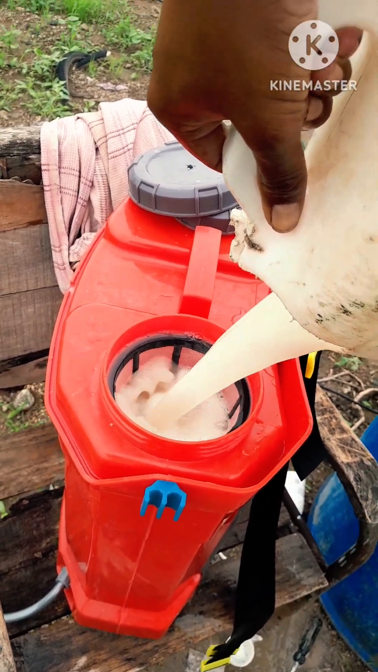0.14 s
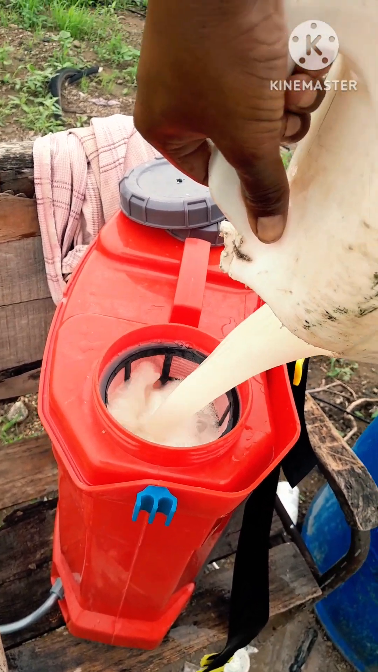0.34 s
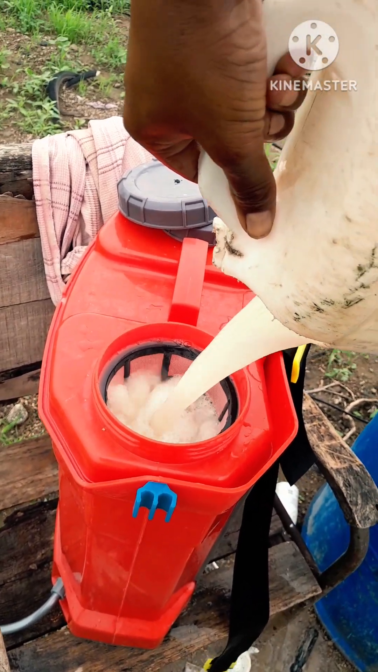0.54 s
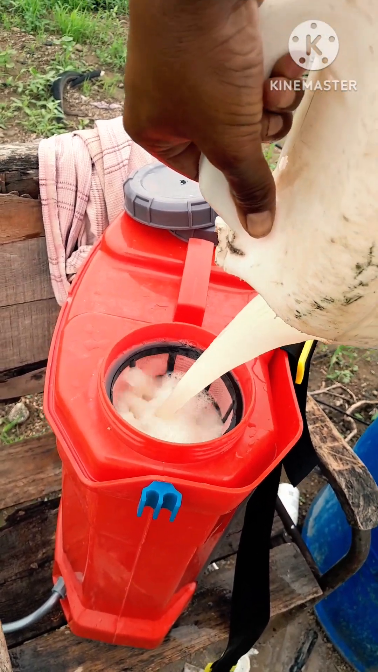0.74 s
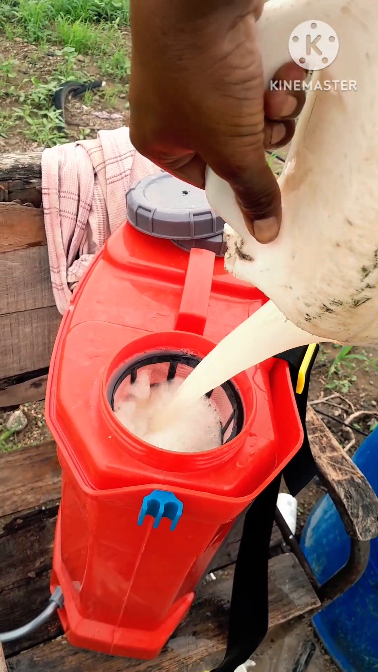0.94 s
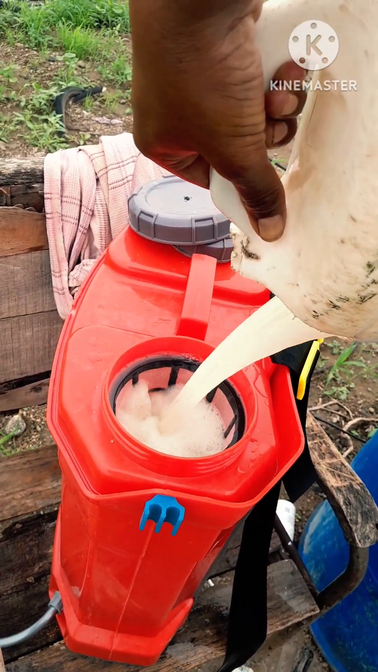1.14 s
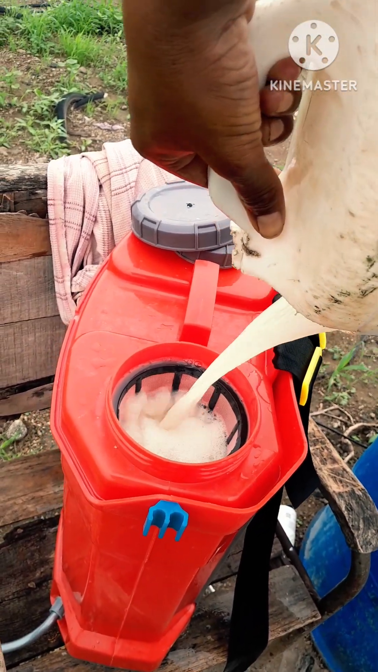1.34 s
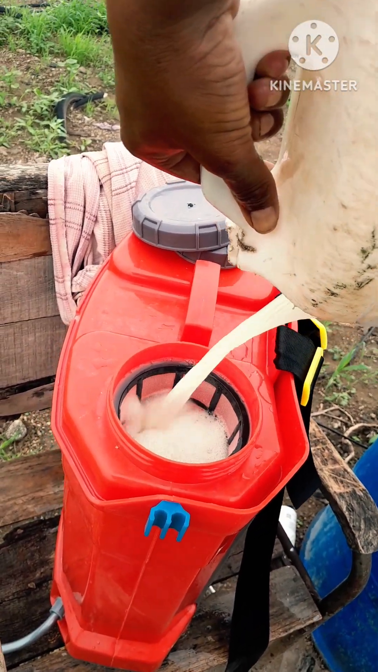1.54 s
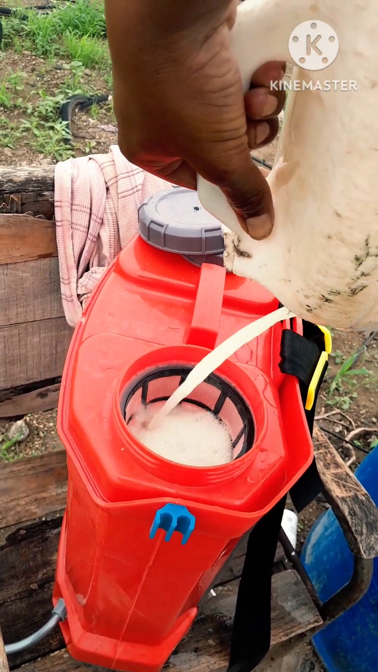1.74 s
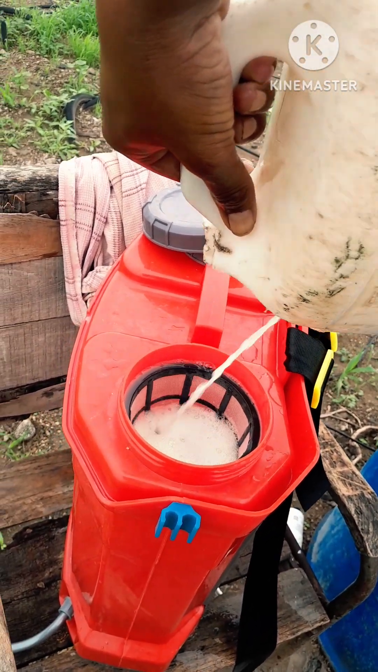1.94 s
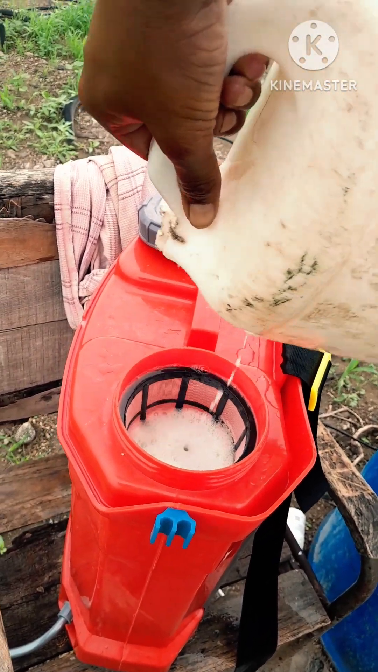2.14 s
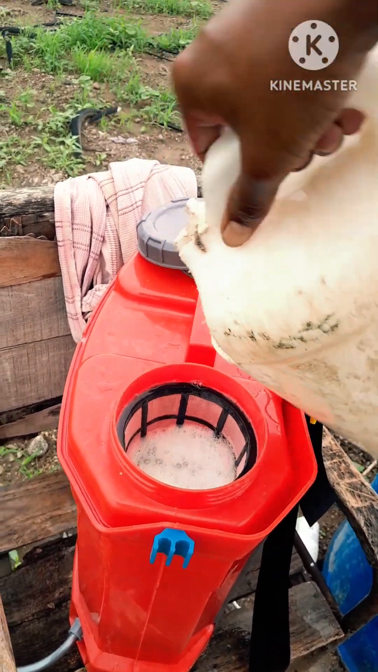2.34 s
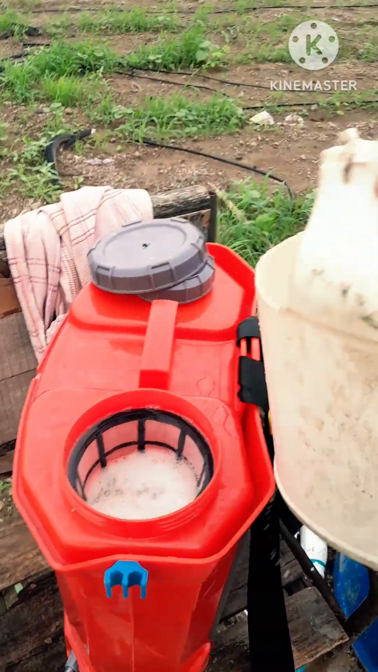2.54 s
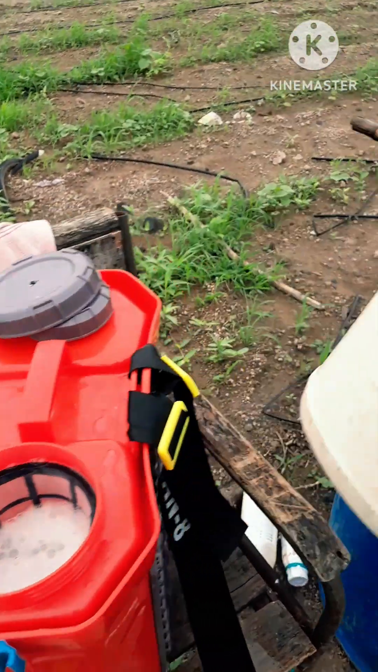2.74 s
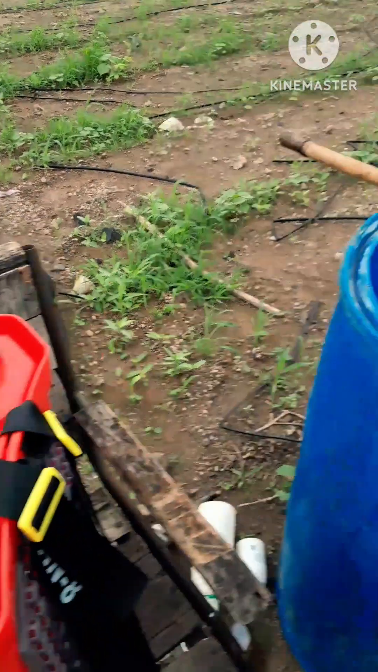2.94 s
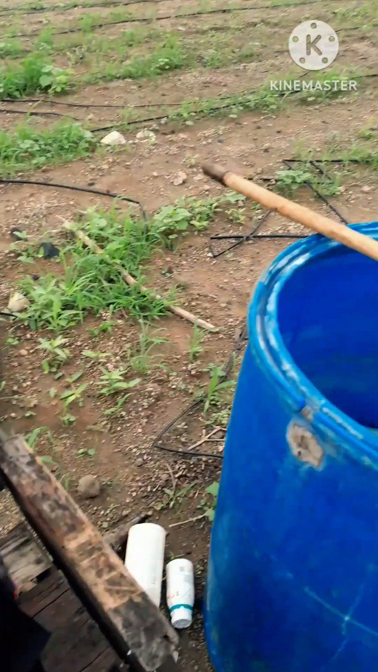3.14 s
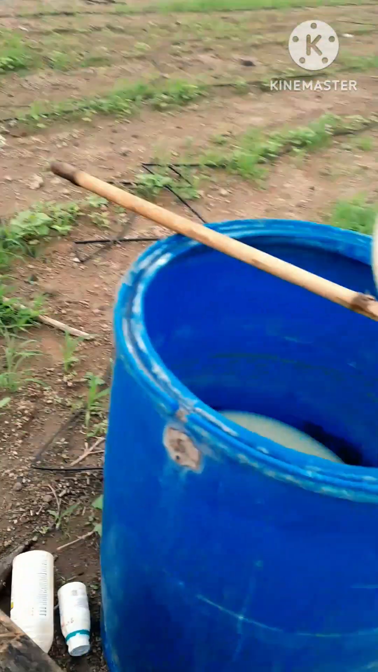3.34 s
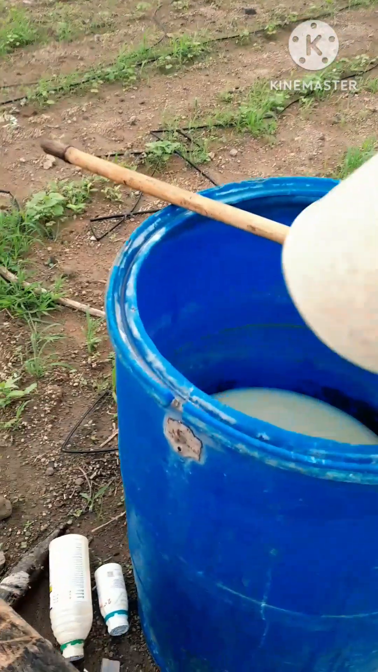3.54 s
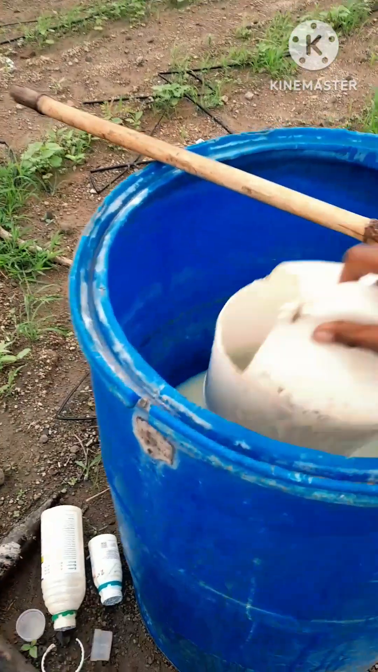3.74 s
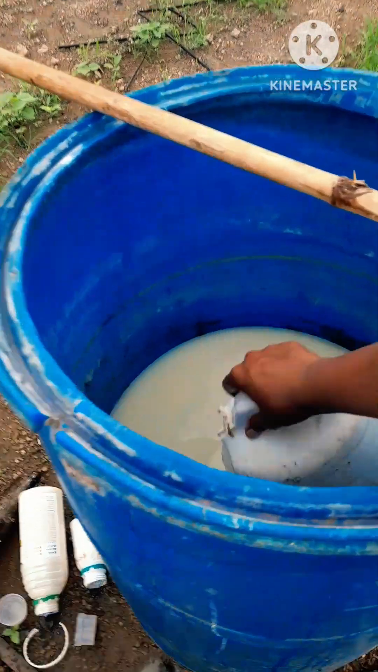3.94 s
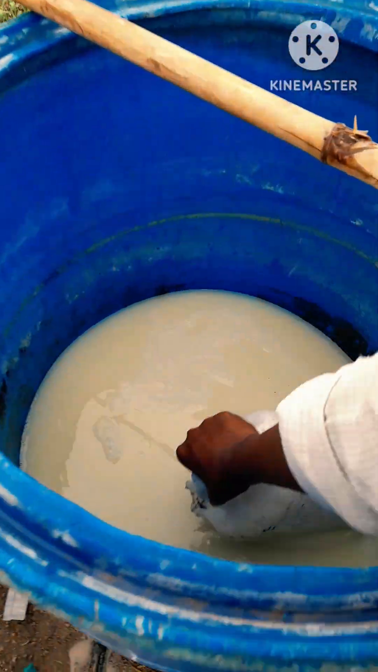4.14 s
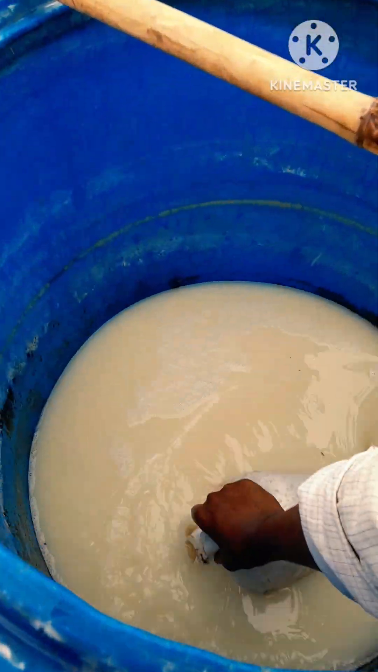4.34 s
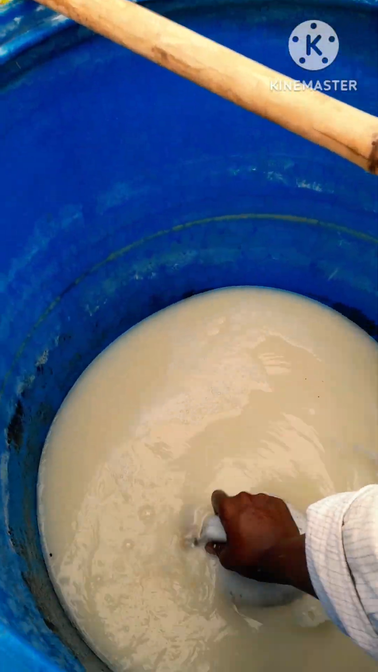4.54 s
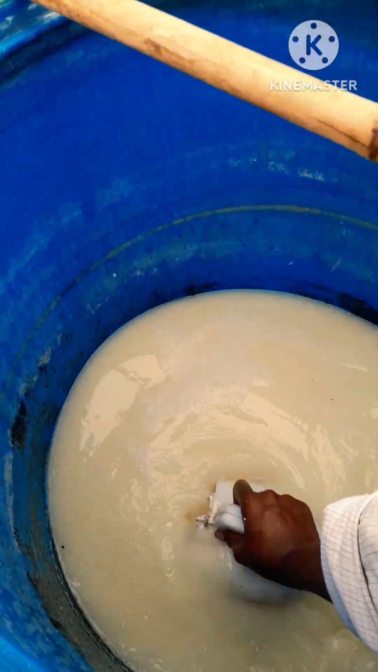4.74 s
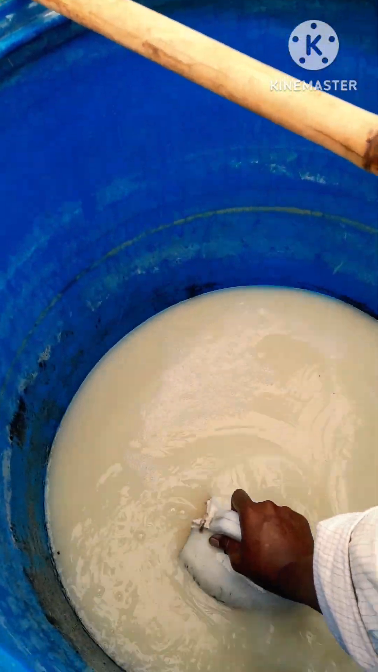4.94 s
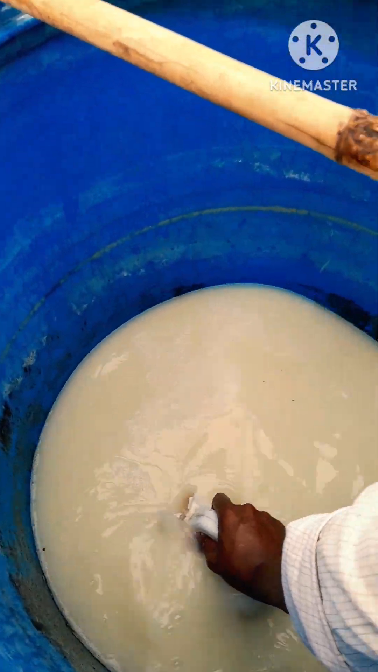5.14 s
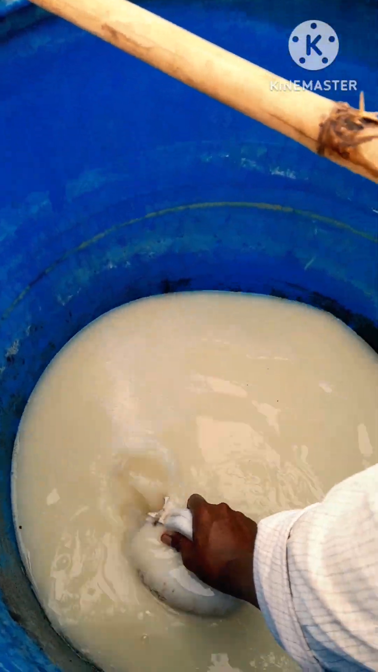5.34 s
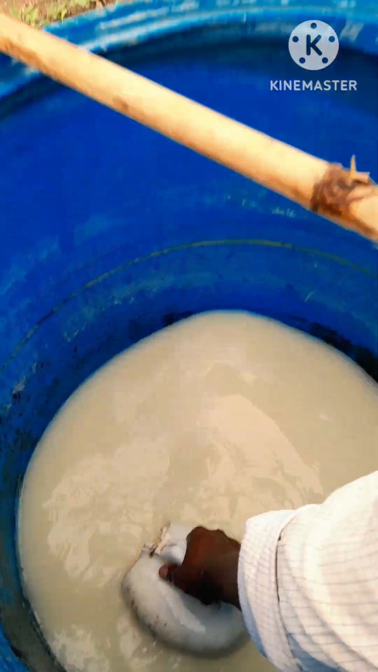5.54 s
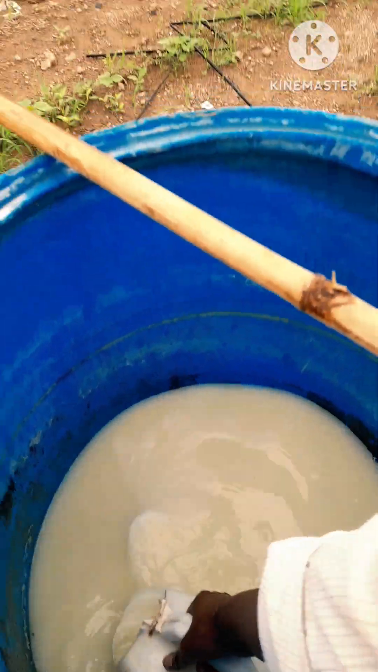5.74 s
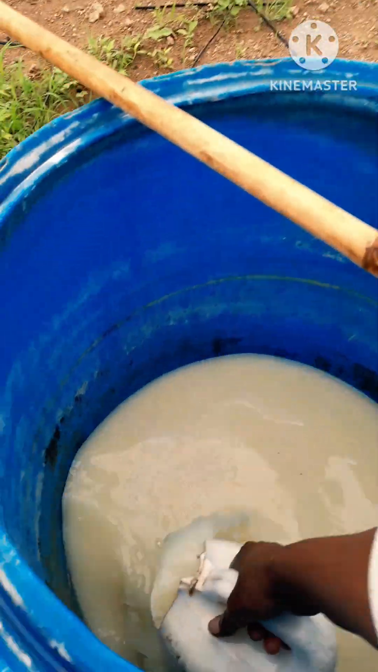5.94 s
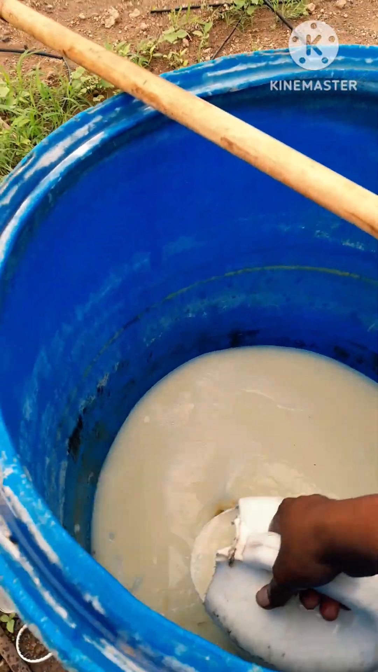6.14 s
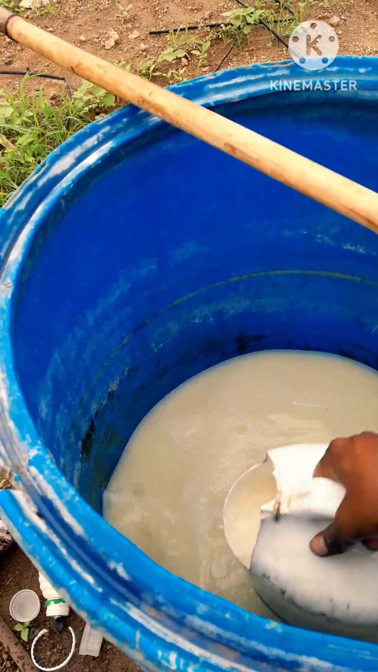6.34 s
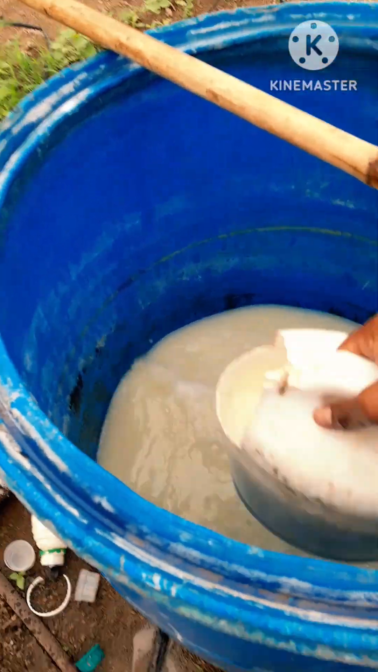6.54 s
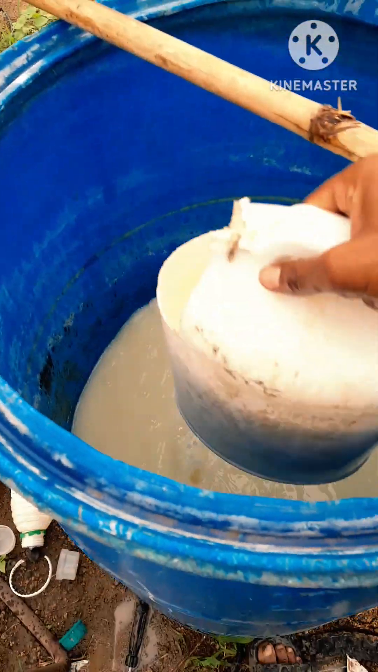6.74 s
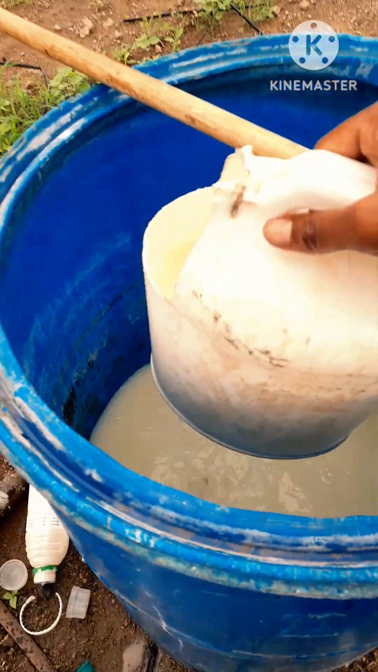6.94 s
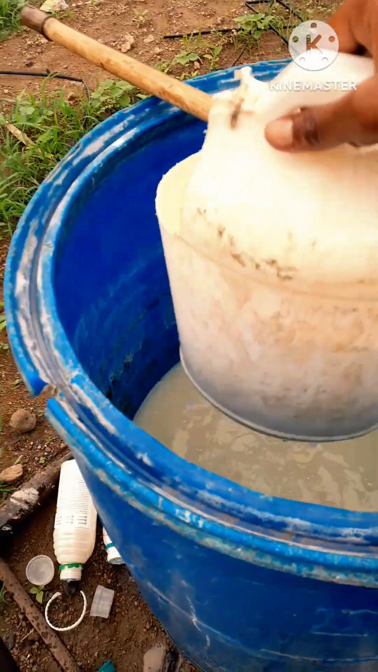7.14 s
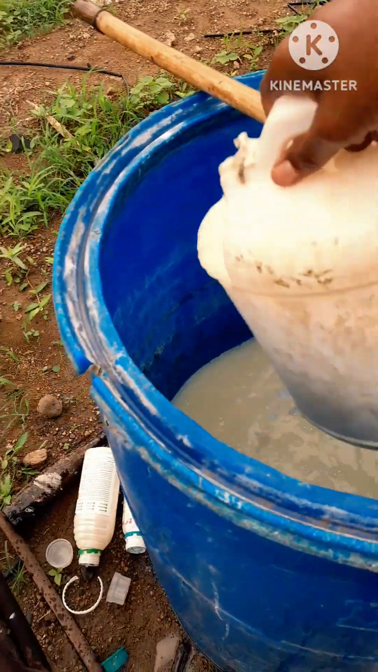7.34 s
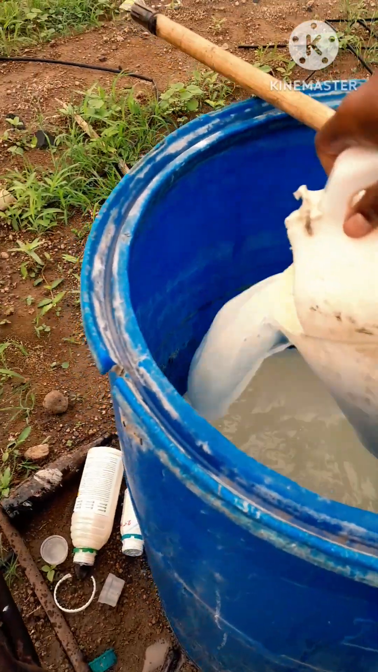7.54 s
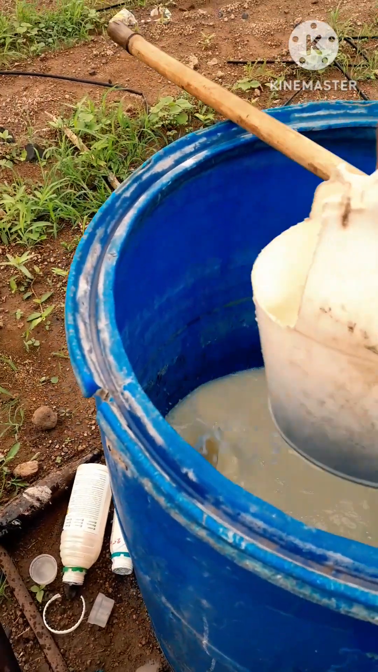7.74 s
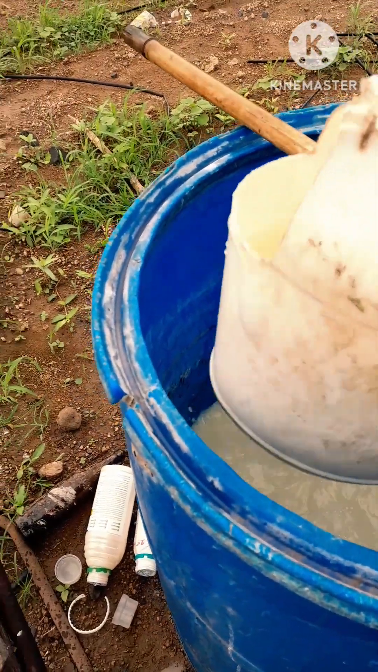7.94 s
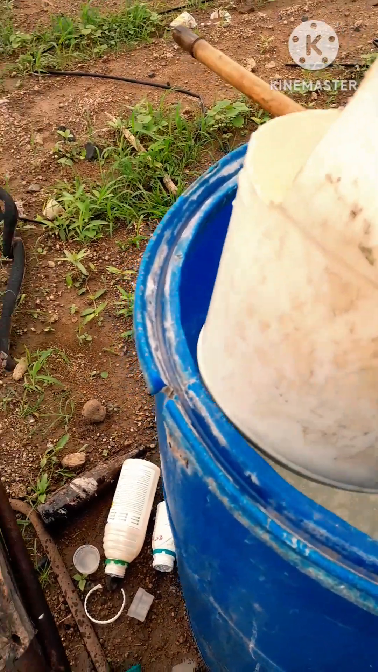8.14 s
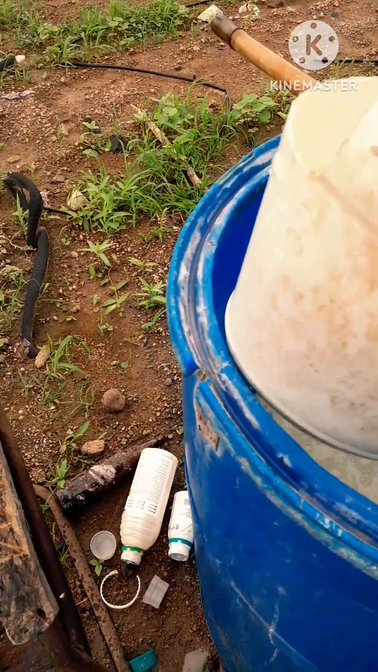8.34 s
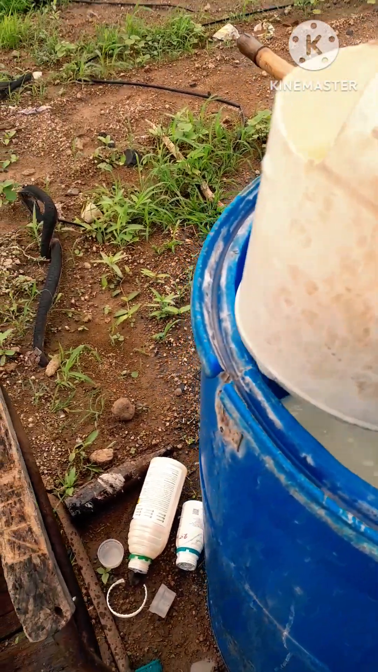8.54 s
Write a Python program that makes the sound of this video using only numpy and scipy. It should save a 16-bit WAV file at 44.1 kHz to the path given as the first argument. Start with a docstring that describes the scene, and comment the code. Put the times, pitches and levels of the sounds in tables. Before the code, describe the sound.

Liquid trickles through a strainer into a hollow tank and thins to drips, then a bucket plunges, gulps, and spills in a ringing barrel.

```python
"""A plastic bucket is dunked in a barrel: it gulps, fills, is lifted dripping, and spills a gush back.
Clouds of bubble tones make the churn, splash and spray, and the barrel's air rings with them.
Before that, liquid runs through a strainer into a sprayer tank and thins to drips: bubble tones again.
Wind is low shaped noise with short swings; shaped noise also makes the outdoor hush and the bucket's swish."""
import sys
import numpy as np
from scipy import signal
from scipy.fft import rfft, irfft, next_fast_len
from scipy.io import wavfile
from scipy.ndimage import uniform_filter1d, map_coordinates

SR = 44100
rng = np.random.default_rng(int(sys.argv[2]) if len(sys.argv) > 2 else 0)


def log_audio(samples):
    """Write samples as a 16-bit WAV file to the path given in sys.argv[1]."""
    # one column per channel
    frames = np.atleast_2d(samples).T
    # limit to full scale, then quantise
    limited = np.clip(frames, -1, 1)
    pcm = np.round(limited * 32767).astype(np.int16)
    wavfile.write(sys.argv[1], SR, pcm)


N = 378819

# Levels in the tables are relative: mixing, ringing and random swings come on top.
# how alike liquid noise is at left and right: [f/Hz, likeness 0-1]
WATER_ALIKE = [(200, 0.77), (600, 0.75), (1200, 0.02), (2500, 0.11), (10000, 0)]
# tone colour of small cracks and spatter: [f/Hz, level/dB]
CRACK_COLOUR = [(300, 1.5), (900, 3.5), (2800, 8), (6500, -2), (9500, -12), (15500, -14)]


def amp(db):
    """Turn decibels into a gain."""
    return 10 ** (np.asarray(db) / 20)


def unit(x):
    """Scale to an average strength (rms) of 1."""
    return x / np.sqrt(np.mean(x ** 2) + 1e-20)


def along(points, hz):
    """Read values between (f/Hz, value) points, with frequency on a log axis."""
    f, v = np.transpose(points)
    return np.interp(np.log(hz + 1), np.log(f + 1), v)


def curves(rows):
    """Give one value per sample for each column after the time."""
    s, *columns = np.transpose(rows)
    return [np.interp(np.arange(N) / SR, s, column) for column in columns]


def between(start_s, end_s):
    """Give 1 from start to end and 0 elsewhere, with soft edges."""
    t = np.arange(N) / SR
    inside = 1.0 * ((t >= start_s) & (t <= end_s))
    return uniform_filter1d(inside, size=900)


def wobble(rate):
    """Draw a smooth random curve through `rate` random points a second."""
    points = rng.standard_normal(int(N * rate / SR) + 4)
    return map_coordinates(points, [np.arange(N) * rate / SR])


def filtered(x, response):
    """Change the strength of each frequency in x by a given response."""
    m = next_fast_len(N + SR // 2)
    hz = np.fft.rfftfreq(m, 1 / SR)
    return irfft(rfft(x, m) * response(hz), m)[..., :N]


def coloured(x, spectrum):
    """Give x a tone colour without sounding ahead of time, at rms 1."""
    def response(hz):
        # folding the cepstrum onto positive times makes the filter causal
        cepstrum = irfft(np.log(amp(along(spectrum, hz))))
        half = len(cepstrum) // 2
        folded = 2 * cepstrum[:half] * (np.arange(half) > 0)
        return np.exp(rfft(folded, len(cepstrum)))
    return unit(filtered(x, response))


def noise_pair(alike):
    """Make white noise at two microphones by mixing a shared and an opposed part."""
    def shares(hz):
        turn = np.arccos(np.clip(along(alike, hz), -1, 1)) / 2
        return np.array([np.cos(turn), np.sin(turn)])
    mid, side = filtered(rng.standard_normal((2, N)), shares)
    return np.array([mid + side, mid - side])


def narrow_noise(hz, width_hz, steady):
    """Make a fuzzy tone that follows a pitch curve, rms 1; random drift blurs the pitch."""
    drift = steady + wobble(width_hz) + 1j * wobble(width_hz)
    carrier = np.exp(2j * np.pi * np.cumsum(hz) / SR)
    return unit(np.real(drift * carrier))


def add(track, s, sound):
    """Mix a sound into a track at time s."""
    start = max(round(s * SR), 0)
    part = track[start:start + len(sound)]
    part += sound[:len(part)]


def from_left(x):
    """The sound reaches the left microphone first, less so as the barrel comes to the front."""
    # how much sooner the left hears it: [t/s, lead/s]
    lead_table = [(4.5, 0.00024), (6.2, .00023), (6.9, 0.00016), (8, 0.000087)]
    lead_s, = curves(lead_table)
    return np.array([map_coordinates(x, [np.arange(N) + side * lead_s * SR / 2]) for side in (1, -1)])


def bubbles(rate, low_hz, high_hz, cycles, spread_db, rise, wash):
    """Many bubbles, `rate` a second, each ring with a rising, dying tone; smooth noise (`wash`) joins them."""
    when, size, pitch, phase, bearing = rng.random((int(rate * N / SR), 5)).T
    hz = (low_hz * (high_hz / low_hz) ** pitch)[:, None]
    length = min(int(cycles / low_hz * SR), 5000000 // len(hz))  # the second limit saves memory
    t = np.arange(length) / SR
    age = t * hz / cycles  # reaches 1 after the given number of cycles
    size_db = spread_db * np.minimum(-np.log(1 - size), 4)
    strength = amp(size_db)[:, None] * (hz / low_hz) ** 0.91
    polarity = np.sign(phase - .5)[:, None]
    swing = np.sin(2 * np.pi * hz * t * (1 + rise * np.minimum(age, 1) / 2))
    tones = strength * polarity * amp(-45 * age) * swing
    # each bubble sits at its own bearing and reaches one microphone first
    lag = (bearing - .5) * .0003 * SR
    cloud = []
    for side in (-1, 1):
        start = np.abs(when * N + side * lag).astype(int)
        places = start[:, None] + np.arange(len(t))
        cloud.append(np.bincount(places.ravel(), tones.ravel(), N)[:N])
    return unit(unit(np.array(cloud)) + wash * noise_pair(WATER_ALIKE))


def turbulent(x, depth_db):
    """Bubble clouds form and break up: narrow bands swell and sink at random."""
    z = signal.stft(x, nperseg=1024)[2]
    patch_shape = np.outer(np.hanning(6), np.hanning(8))
    patches = signal.fftconvolve(rng.standard_normal(z.shape[1:]), patch_shape, mode="same")
    return unit(signal.istft(z * amp(depth_db * unit(patches)), nperseg=1024)[1][:, :N])


def ring(hz, t60, attack, rise):
    """One bubble rings with a soft start, a sliding pitch and a decay; its envelope peaks at 1."""
    t = np.arange(SR // 3) / SR
    shape = amp(-60 * t / t60) * (1 - np.exp(-(t / attack) ** 2))
    return shape / shape.max() * np.sin(2 * np.pi * hz * t * (1 + rise * np.minimum(t / t60, 1)))


def glide(length, start_hz, end_hz):
    """A tone swells and fades while its pitch slides."""
    u = np.linspace(0, 1, max(int(length * SR), 2))
    hz = start_hz * (end_hz / start_hz) ** u
    return np.sin(np.pi * np.sqrt(u)) * np.sin(2 * np.pi * np.cumsum(hz) / SR)


def echo(x, decay):
    """A vessel answers with a blurred echo; each frequency dies at its own speed."""
    hz, t, z = signal.stft(noise_pair(WATER_ALIKE)[:, :SR // 2], SR, nperseg=256)
    t60 = along(decay, hz)[:, None]
    fading = z * amp(-60 * t / t60) * np.sqrt(2 * np.log(1000) / (t60 * SR))
    tail = signal.istft(fading, SR, nperseg=256)[1]
    return signal.fftconvolve(x.mean(0)[None], tail, axes=1)[:, :N]


def standing_waves(x, modes):
    """The air between a vessel's walls rings on in narrow tones."""
    t = np.arange(SR // 2) / SR
    answer = np.zeros(len(t))
    for hz, db, t60 in modes:
        even_out = np.log(1000) / (t60 * SR)  # long rings are not favoured over short ones
        answer += amp(db - 60 * t / t60) * np.cos(2 * np.pi * hz * t) * even_out
    return signal.fftconvolve(x, 2 * answer)[:N]


def field():
    """Noise makes the field's hush and the lowered bucket's swish and brushes; a faint tone whistles down."""
    # the open-air hush: [t/s, level/dB]
    hush_table = [(2.2, -64), (3.1, -69), (5.7, -62), (5.9, -68.5), (6.1, -64)]
    # colour of the hush: [f/Hz, level/dB]
    air_colour = [(30, -4.5), (120, 1), (500, -9.5), (900, -11.5), (1500, -8), (4000, -11), (8200, -16.5),
                  (9000, -24.5), (15500, -22.5)]
    # soft swish as the bucket is lowered into the barrel: [t/s, level/dB, centre f/Hz]
    swish_table = [(3.6, -87, 2700), (3.8, -64.5, 2600), (3.95, -63, 2400), (4.05, -60, 2070),
                   (4.26, -61, 2700), (4.38, -63.5, 1794), (5.75, -63, 1800), (5.87, -85, 1790)]
    # colour of the swish: [f/Hz, level/dB]
    swish_colour = [(150, -3), (500, 7), (1100, -2.5), (2300, -1.5), (3500, -4), (7500, -8), (9500, -15),
                    (15500, -15)]
    # sleeve and bucket brush past the rim: [t/s, length/s, level/dB, centre f/Hz]
    brushes = [(3.725, 0.049, -57, 2250), (4.225, .03, -55.5, 1500), (4.309, 0.043, -59, 3500)]
    swish_db, swish_hz = curves(swish_table)
    hush_db, = curves(hush_table)
    whistle = np.zeros(N)
    add(whistle, 3.49, amp(-71.0) * glide(length=0.2, start_hz=6250, end_hz=2730))
    band = np.array([narrow_noise(swish_hz, width_hz=700, steady=0) for channel in range(2)])
    swish_noise = unit(coloured(noise_pair(WATER_ALIKE), swish_colour) + 0.5 * band)
    swish = amp(swish_db + 4.5 + 1.4 * wobble(16)) * swish_noise
    for channel in swish:
        roughness = wobble(1600)  # blurs each brush tone into a noise band
        for s, length, db, hz in brushes:
            stroke = glide(length, hz, hz)
            add(channel, s, amp(db + 3.5) * stroke * roughness[round(s * SR):][:len(stroke)])
    hush = amp(hush_db) * coloured(noise_pair(WATER_ALIKE), air_colour)
    return hush + from_left(whistle * wobble(150)) + swish


def wind():
    """Lumpy eddies and a few hard buffets press on each microphone port differently."""
    # wind strength that drives the eddies: [t/s, level/dB]
    wind_table = [(0, -42), (.35, -40), (.7, -48.5), (1.15, -57), (1.6, -47.5), (2.1, -50.5), (2.2, -55),
                  (2.95, -67), (3.5, -50.5), (3.95, -70), (4.3, -91), (4.5, -63), (5.5, -58), (5.7, -54),
                  (5.9, -71), (6.35, -49.5), (6.65, -55), (7.15, -42), (8.15, -44), (8.55, -40)]
    # which port the wind favours: [t/s, left minus right level/dB]
    side_table = [(0, -7), (3.5, -3.5), (6, -3), (6.8, 3.5), (7.3, 6), (7.6, 5), (8.5, 2)]
    # how alike the wind is at left and right: [f/Hz, likeness 0-1]
    wind_alike = [(25, 0.13), (200, 0.056)]
    # colour of the large eddies: [f/Hz, level/dB]
    rumble_colour = [(20, -25.5), (50, 1), (100, 1), (150, -9), (240, -22), (450, -40.5), (1000, -66)]
    # colour of the smaller, higher eddies: [f/Hz, level/dB]
    flutter_colour = [(90, -21), (170, -0.5), (260, -6.5), (450, -15), (1000, -68.5)]
    # single buffets, each port varying around them: [t at the peak/s, level/dB, pitch f/Hz]
    buffets = [(0.105, -18.5, 80), (0.299, -22, 68), (0.646, -30.5, 72), (1.545, -23, 100),
               (2.053, -24, 78), (2.322, -32.5, 88), (3.332, -36, 85), (3.419, -35.5, 83),
               (6.326, -31.5, 94), (6.802, -28.5, 70), (7.101, -14.5, 115), (7.166, -24.5, 107),
               (7.334, -22.5, 88.4), (7.607, -21, 102), (7.829, -15.5, 118), (8.003, -21.5, 106),
               (8.217, -26, 94), (8.411, -17, 120), (8.5, -21, 157), (8.546, -19, 92)]
    level_db, = curves(wind_table)
    side_db, = curves(side_table)
    eddy_swing_db = 4.5 * wobble(14)
    port_swing_db = 4 * np.array([wobble(28), wobble(28)])
    lumps = amp(eddy_swing_db + port_swing_db)
    air = amp(level_db + 7.5) * unit(lumps * coloured(noise_pair(wind_alike), rumble_colour))
    # stronger gusts shed smaller, higher eddies
    flutter = unit(lumps * coloured(noise_pair(wind_alike), flutter_colour))
    air = air + amp(1.498 * level_db + 17) * flutter
    t = np.arange(-SR // 20, SR // 20) / SR
    for s, db, hz in buffets:
        for port in air:
            late, detune = rng.standard_normal(2)
            cycles = (t - 0.0012 * late) * hz * np.exp(0.15 * detune)
            hump = 1 / (1 + (cycles / 0.65) ** 2) ** 1.4  # only about one swing stands out
            add(port, s + t[0], amp(db + 0.5) * np.sin(2 * np.pi * cycles) * hump)
    return air * amp(np.array([[.5], [-.5]]) * side_db)


def ticks():
    """Each loud drop or light tap of plastic is a short noise crack and a tiny ring."""
    # drops and taps: [t/s, level/dB, starting pitch f/Hz]
    tick_table = [(.198, -41.5, 1510), (.344, -39, 2360), (0.661, -40.5, 1450), (1.248, -44, 1850),
                  (1.336, -39, 3130), (1.493, -37.5, 3570), (1.545, -42, 3100), (1.672, -42.5, 2000),
                  (1.981, -43.5, 1870), (2.092, -34.5, 1300), (2.157, -40, 2570), (2.21, -43, 1460),
                  (2.593, -38, 1490), (3.216, -42.5, 1130), (3.258, -41.5, 2820), (4.446, -21, 1450),
                  (5.45, -35, 2570), (5.568, -30, 2960), (5.645, -36.5, 4380), (6.035, -31, 825),
                  (6.095, -22, 1790), (6.104, -21.5, 3140), (6.171, -26.5, 6700), (6.266, -25.5, 2130),
                  (6.336, -27, 3100), (6.37, -30, 1550), (6.423, -33, 2930), (6.537, -39, 1880),
                  (6.626, -40.5, 2650), (6.664, -42.5, 4900), (6.721, -46, 4100), (6.796, -35, 2760),
                  (7.109, -35, 3000), (7.19, -37.5, 3070), (7.465, -28.5, 1270), (7.724, -27.5, 3100),
                  (8.136, -28, 2760), (8.241, -37.5, 6400), (8.31, -38, 2350)]
    out, t = np.zeros((2, N)), np.arange(SR // 3) / SR
    for channel, noise in zip(out, coloured(noise_pair(WATER_ALIKE), CRACK_COLOUR)):
        for s, db, hz in tick_table:
            crack = np.roll(noise, -round(s * SR))[:len(t)] * amp(-60 * t / 0.027)
            tiny_ring = ring(hz, t60=0.016, attack=0.00087, rise=0.092)
            add(channel, s, amp(db) * (0.35 * crack + 0.35 * tiny_ring))
    return out


def glugs():
    """Bubbles and dull bumps ring briefly and are jostled as they ring."""
    # deep bubbles and bumps of nearly steady pitch: [t/s, level/dB, pitch f/Hz, time to fade 60 dB/s]
    glug_table = [(.202, -41, 376, .06), (.991, -39, 420, .06), (1.108, -32, 424, 0.087),
                  (1.211, -34.5, 414, .06), (1.273, -40.5, 940, .07), (2.069, -30, 412, 0.061),
                  (2.116, -36, 394, 0.056), (2.194, -33, 435, 0.088), (2.6, -39.5, 253, 0.086),
                  (2.83, -46, 222, .09), (4.447, -25.5, 650, 0.076), (6.275, -36.5, 407, 0.18),
                  (6.423, -42, 597, 0.081), (6.72, -50.5, 1035, .14), (6.748, -48, 1040, 0.27),
                  (6.79, -47, 1310, 0.25), (6.845, -49, 2020, 0.14), (7.092, -32, 308, 0.052),
                  (7.338, -32, 347, 0.053), (7.495, -30, 296, 0.065), (7.527, -30.5, 422, .1),
                  (7.597, -25.5, 563, 0.037), (7.612, -26.5, 370, 0.054), (7.646, -31, 387, 0.067),
                  (8.196, -27.5, 418, 0.071), (8.248, -35, 350, 0.067), (8.267, -31.5, 399, 0.094),
                  (8.41, -32.5, 280, 0.055), (8.446, -33, 257, 0.084), (8.498, -39, 247, 0.067),
                  (8.512, -32.5, 290, 0.053)]
    out = np.zeros(N)
    for s, db, hz, t60 in glug_table:
        add(out, s, amp(db) * ring(hz, t60, attack=0.00035, rise=0.014))
    return out * (1 + 0.5 * wobble(260))


def patter():
    """Each heavy drop gives the hollow tank a dull slap of noise and a brief ring."""
    # lumps of the stream, then its last drops: [t/s, level/dB, starting pitch f/Hz, ring's 60 dB fade/s]
    drip_table = [(1.109, -36.5, 580, 0.062), (1.14, -41, 1063, 0.066), (1.54, -41.5, 815, .06),
                  (2.261, -39.5, 855, 0.079), (2.299, -37, 633, 0.055), (2.408, -40, 660, 0.086),
                  (2.465, -48, 410, .07), (2.494, -44, 894, 0.08), (2.593, -35, 463, 0.039),
                  (2.6, -45, 906, 0.13), (2.843, -47, 858, 0.15), (2.931, -46.5, 400, 0.052),
                  (3.321, -47, 663, 0.19), (3.402, -45, 836, 0.064), (3.418, -46, 647, 0.073),
                  (3.501, -54, 1233, 0.24), (3.609, -45, 1107, 0.062), (3.645, -52, 840, 0.23),
                  (3.69, -45.5, 848, 0.1), (3.771, -45, 423, .08)]
    # colour of the slaps: [f/Hz, level/dB]
    slap_colour = [(180, -21), (400, -2.5), (650, 0), (1000, 10), (1500, -9.5), (3000, -13), (9000, -32)]
    slaps, rings, t = np.zeros(N), np.zeros(N), np.arange(SR // 3) / SR
    for s, db, hz, t60 in drip_table:
        add(slaps, s, amp(db - 60 * t / 0.064))
        add(rings, s, amp(db) * ring(hz, t60, attack=0.0014, rise=0.014))
    slap_sound = amp(-10.5) * slaps * coloured(noise_pair(WATER_ALIKE), slap_colour)
    return slap_sound + amp(-6) * rings * (1 + 0.5 * wobble(190))


def sprayer(drops, pops):
    """The stream bubbles in the strainer's pool; foam fizzes, drops spatter on the mesh and drip into the tank."""
    # colour of the pool's gurgle: [f/Hz, level/dB]
    gurgle_colour = [(150, -4.5), (210, -4.5), (280, -9.5), (400, -3), (560, -6.5), (720, -10.5),
                     (860, -11.5), (1150, -12), (1600, -24), (2500, -24.5)]
    # colour of the foam: [f/Hz, level/dB]
    fizz_colour = [(800, -47), (1400, -13.5), (1900, -1), (2120, -8.5), (2450, 3), (2750, -7), (3150, -2),
                   (3400, -9.5), (3700, -2.5), (4300, -10.5), (6200, -7.5), (8200, -3.5), (9000, -14),
                   (15500, -15)]
    # the strainer goes on dripping into the tank: [from t/s, to t/s, level/dB]
    dripping_table = [(2.2, 2.68, -61.5), (2.796, 2.993, -68), (3.276, 3.797, -77)]
    # hollow notes of the tank: [f/Hz, level/dB, time to fade 60 dB/s]
    tank_modes = [(374, 0.5, 0.07), (655, -4, 0.27), (867, 3, 0.25), (1180, -9, 0.23)]
    # how fast the tank's echo dies: [f/Hz, time to fade 60 dB/s]
    tank_decay = [(300, 0.087), (2500, 0.3), (10000, 0.072)]
    # the stream runs evenly until the bucket is tipped back, then the pool settles
    stream_ends_s, gurgle_fade_db_per_s, fizz_fade_db_per_s = 2.185, 26.5, 68
    settling_s = np.maximum(np.arange(N) / SR - stream_ends_s, 0)
    sway_db = 0.8 * wobble(14)
    gurgle = bubbles(rate=520, low_hz=216, high_hz=1734, cycles=11.3, spread_db=3.5, rise=0.16, wash=0.15)
    fizz = bubbles(rate=1300, low_hz=1203, high_hz=5960, cycles=14, spread_db=3.5, rise=0.1, wash=0.64)
    spatter = bubbles(rate=90, low_hz=1280, high_hz=4200, cycles=3.1, spread_db=1.5, rise=0.14, wash=.05)
    drips = bubbles(rate=40, low_hz=374, high_hz=930, cycles=19, spread_db=-1.0, rise=0.026, wash=0.018)
    pool_gain = amp(-51.5 + sway_db - gurgle_fade_db_per_s * settling_s)
    pool = pool_gain * coloured(gurgle, gurgle_colour)
    foam_gain = amp(sway_db - fizz_fade_db_per_s * settling_s)
    foam_mix = amp(-60.5) * coloured(fizz, fizz_colour) + amp(-70.5) * coloured(spatter, CRACK_COLOUR)
    dripping = sum(amp(db) * between(start_s, end_s) for start_s, end_s, db in dripping_table)
    liquid = pool + foam_gain * foam_mix + dripping * drips + patter() + drops + pops
    hollow_notes = amp(-3.5) * standing_waves(liquid.mean(0), tank_modes)
    return liquid + hollow_notes + amp(-2.5) * echo(liquid, tank_decay)


def inflow():
    """Liquid sheets over the sunken rim into the bucket with the smooth hiss of shaped noise."""
    # strength of the hiss: [t/s, level/dB]
    inflow_table = [(4.53, -60), (4.58, -49), (4.75, -47.5), (5.0, -48.5), (5.22, -51), (5.32, -57.5),
                    (5.72, -65), (5.85, -87)]
    # colour of the hiss: [f/Hz, level/dB]
    inflow_colour = [(700, -25), (1600, -12), (3000, 0.5), (4200, 0.5), (6700, -4.5), (9000, -16.5),
                     (12000, -11.5), (15500, -12.5)]
    level_db, = curves(inflow_table)
    flowing = between(inflow_table[0][0], inflow_table[-1][0])
    return flowing * amp(level_db) * coloured(noise_pair(WATER_ALIKE), inflow_colour)


def gulps():
    """Air escapes the sinking bucket in deep gulps; the trapped pocket drones unevenly."""
    # air trapped in the filling bucket: [t/s, centre f/Hz, level/dB]
    pocket = [(4.68, 124.3, -40), (4.696, 125, -29.5), (4.89, 159.3, -38.5), (4.924, 178, -31),
              (4.966, 169.6, -38), (5.24, 139.4, -27), (5.316, 134, -33.5), (5.33, 138, -23.5)]
    # big air gulps as the bucket goes under: [t/s, level/dB, starting pitch f/Hz, time to fade 60 dB/s]
    gulp_table = [(4.402, -34.5, 122.3, 0.45), (4.488, -15.5, 123.4, 0.18), (4.553, -15, 117, 0.19),
                  (4.646, -20, 107.3, 0.2), (5.337, -10.5, 112.3, 0.25)]
    hz, db = curves(pocket)
    trapped = between(pocket[0][0], pocket[-1][0])
    out = trapped * amp(db - 4.0) * narrow_noise(hz, width_hz=92, steady=0.53)
    for s, peak_db, pitch_hz, t60 in gulp_table:
        add(out, s, amp(peak_db) * ring(pitch_hz, t60, attack=0.0077, rise=-0.02))
    return out


def plops():
    """A cavity's pitch rises as it closes at the surface, and its walls tremble."""
    # closing cavities, all rising at one speed: [t/s, length/s, starting f/Hz, level/dB]
    plop_table = [(4.47, 0.015, 3100, -37), (4.787, 0.048, 545.6, -25), (4.799, 0.062, 686, -31),
                  (5.381, 0.082, 698, -43.5), (6.152, 0.024, 580, -38), (6.367, 0.02, 1390, -34.5),
                  (6.439, 0.035, 515, -40), (6.459, 0.055, 862, -39.5), (7.431, 0.019, 1230, -48),
                  (7.508, 0.014, 1536, -41.5), (7.615, .012, 2790, -38.5), (7.84, 0.017, 706, -27),
                  (7.841, 0.017, 1600, -31), (7.914, 0.012, 910, -24.5), (8.047, 0.067, 380, -43),
                  (8.16, .014, 1180, -48)]
    rise_oct_per_s = 17.8
    out = np.zeros(N)
    for s, length, hz, db in plop_table:
        add(out, s, amp(db) * glide(length, hz, hz * 2 ** (rise_oct_per_s * length)))
    return out * amp(4.5 * wobble(260))


def sloshing():
    """Every slosh swells, holds and fades in churn, splash and spray, and comes in uneven slaps."""
    # each move of the bucket throws up liquid, in turn: it hits the surface, fills, squeezes out its
    # last air, settles, turns under the surface, nears the surface; its rim breaks out, liquid runs
    # off the rim, its body follows, its base pulls free; it drains and spills over; the gush slides
    # down the wall, lands, plunges in, its hollow collapses, the waves slap back and lap once more;
    # the bucket is set upright and the load swings back
    # [t/s, swell/s, hold/s, fade/dB per s, churn level/dB, splash level/dB, spray level/dB]
    sloshes = [(4.432, 0.013, 0.0065, 159, -46, -42, -47), (4.512, .3, 0.27, 53, -48.5, -38.5, -51.5),
               (5.16, 0.012, 0.03, 200, -62.5, -40, -49.5), (5.335, 0.044, 0.039, 64, -55.5, -50.5, -69),
               (5.629, 0.033, 0.047, 128, -53, -57, -59), (5.959, 0.044, .02, 103, -73, -54, -61),
               (6.02, 0.059, .015, 93, -54.5, -47, -51.5), (6.112, 0.022, 0.094, 165, -59.5, -47.5, -48),
               (6.228, 0.038, 0.013, 198, -54.5, -42.5, -44.5),
               (6.312, 0.0071, 0.018, 299, -50, -47, -46.5), (6.73, 0.024, 0.062, 139, -66, -58.5, -64),
               (7.464, 0.017, 0.15, 233, -37, -55.5, -59.5), (7.7, 0.019, 0.1, 297, -38, -61, -60),
               (7.721, 0.0078, 0.2, 228, -56, -47, -41), (7.738, 0.058, 0.088, 128, -52, -32, -49),
               (7.843, .003, 0.0072, 450, -50, -28.5, -63), (7.936, 0.0054, 0.024, 331, -42, -36.5, -49),
               (8.047, 0.018, 0.021, 148, -60, -49.5, -65), (8.187, 0.0051, 0.013, 224, -40, -51, -60),
               (8.398, 0.029, 0.059, 147, -51.5, -66, -72.5)]
    power = np.zeros((3, N))
    for s, swell_s, hold_s, fade_db_per_s, *levels_db in sloshes:
        age = np.arange(N) / SR - s
        swell = np.clip(age / swell_s, 0, 1) ** 0.62
        fade = amp(-fade_db_per_s * np.maximum(age - swell_s - hold_s, 0))
        power += np.outer(amp(levels_db), swell * fade) ** 2
    return np.sqrt(power) * amp(1.96 * wobble(24))


def barrel(drops, pops):
    """Big bubbles churn, small ones splash, and spray crackles, all inside the ringing barrel."""
    # colour of the big bubbles: [f/Hz, level/dB]
    churn_colour = [(130, -7.5), (210, 1.5), (280, -1), (390, 5), (480, -2), (650, -3), (850, -12),
                    (1500, -44.5)]
    # colour of the small bubbles: [f/Hz, level/dB]
    splash_colour = [(400, -7.5), (760, -2.5), (1050, 0.5), (1330, -2.5), (1750, 0.5), (2400, -1.5),
                     (3100, -1.5), (3800, -11), (6000, -21)]
    # colour of the flying droplets: [f/Hz, level/dB]
    spray_colour = [(2300, -16), (3600, 1), (5000, -1), (6500, -2), (7600, -11), (9200, -21.5),
                    (12000, -10.5), (15500, -10)]
    # colour of the dribble off the wet bucket: [f/Hz, level/dB]
    dribble_colour = [(500, -28), (1300, -9), (3000, 0), (6500, -1.5), (9200, -4), (15500, -5)]
    # air notes of the barrel: [f/Hz, level/dB, time to fade 60 dB/s]
    barrel_modes = [(389.5, -2, 0.26), (594, -0.5, 0.33), (804, -3, .25), (1033, 3, .5), (1116, -2, 0.2),
                    (1310, -6.5, .5), (1590, -3.5, .3), (1710, -2.5, .3), (2020, -2.5, .3), (2420, -3, .25),
                    (2570, -1, .3), (2840, -10.5, 0.32), (2970, 3, 0.27)]
    # how fast the barrel's echo dies: [f/Hz, time to fade 60 dB/s]
    barrel_decay = [(150, 0.17), (700, 0.23), (1500, 0.23), (3000, 0.15), (7000, 0.034), (12000, 0.2)]
    churn_gain, splash_gain, spray_gain = sloshing()
    churn = bubbles(rate=310, low_hz=193.0, high_hz=900, cycles=12.4, spread_db=1.5, rise=0.26, wash=0.36)
    splash = bubbles(rate=700, low_hz=600, high_hz=4200, cycles=30, spread_db=2.5, rise=0.12, wash=0.3)
    spray = bubbles(rate=1300, low_hz=3180, high_hz=12800, cycles=30, spread_db=4.0, rise=0.046, wash=1.0)
    dribble = bubbles(rate=60, low_hz=1080, high_hz=7000, cycles=20, spread_db=2, rise=.15, wash=0.7)
    churn = coloured(churn, churn_colour)
    splash = coloured(turbulent(splash, depth_db=3), splash_colour)
    spray = coloured(spray, spray_colour) * amp(1.6 * wobble(22))  # droplets fly in little volleys
    liquid = churn_gain * churn + splash_gain * splash + spray_gain * spray + drops
    dribble_gain = between(6.3, 8.6) * amp(-62 + 2.8 * wobble(14))
    liquid = liquid + dribble_gain * coloured(dribble, dribble_colour)
    cavities = plops() + amp(1.5) * pops
    ringing = cavities + amp(5.5) * standing_waves(liquid.mean(0) + 0.46 * cavities, barrel_modes)
    answer = amp(-1.5) * echo(liquid + 0.5 * cavities, barrel_decay)
    return amp(-3) * liquid + from_left(ringing) + answer


def scene():
    """Drops and bubbles sound in the sprayer until the bucket moves over to the barrel."""
    drops, pops = ticks(), glugs()
    at_barrel = np.arange(N) / SR > 4.3
    at_sprayer = ~at_barrel
    background = field() + wind()
    pouring = sprayer(drops * at_sprayer, pops * at_sprayer)
    dunking = inflow() + from_left(gulps()) + barrel(drops * at_barrel, pops * at_barrel)
    return background + pouring + dunking


def record(dry):
    """The two microphones differ in colour and keep nothing above the band limit."""
    # how the microphones differ: [f/Hz, left minus right level/dB]
    left_bias = [(60, 2), (200, 1.5), (500, 0), (1300, 0.5), (2400, -0.3), (4400, -2.5), (8500, 9),
                 (15000, 3)]
    top_hz = 15750

    def response(hz):
        return amp(np.array([[.5], [-.5]]) * along(left_bias, hz)) * (hz < top_hz)
    return filtered(dry, response)


dry = scene()
out = record(dry)
log_audio(out)
```